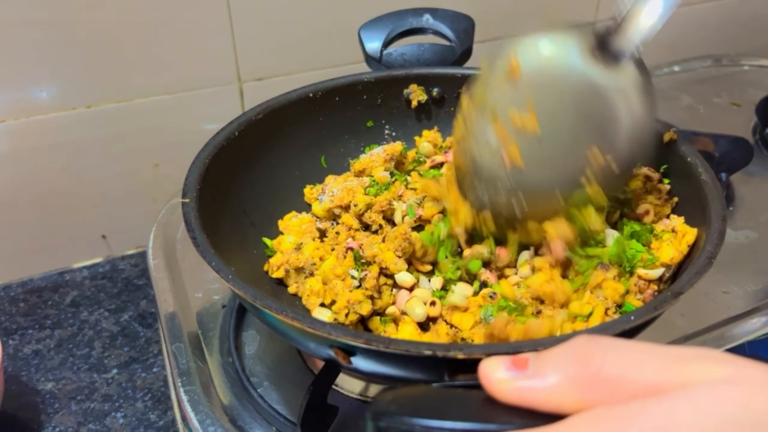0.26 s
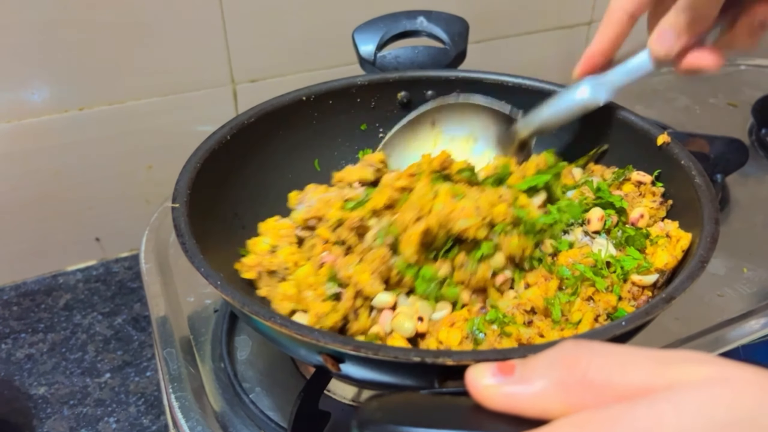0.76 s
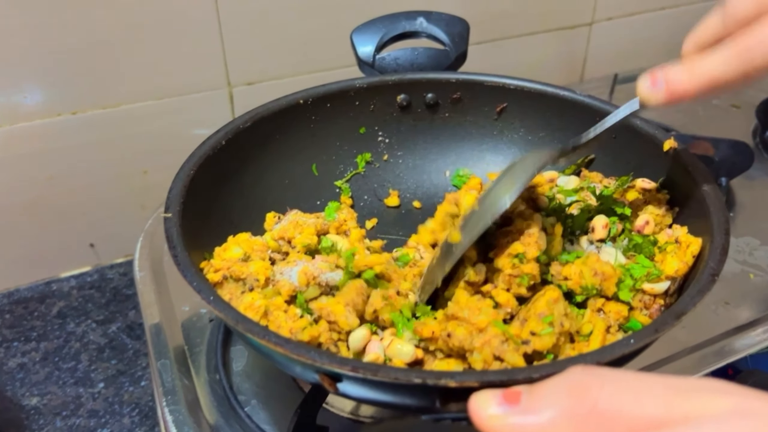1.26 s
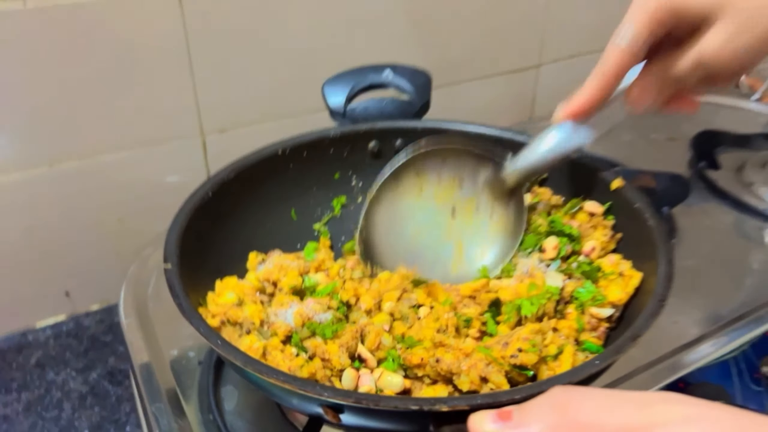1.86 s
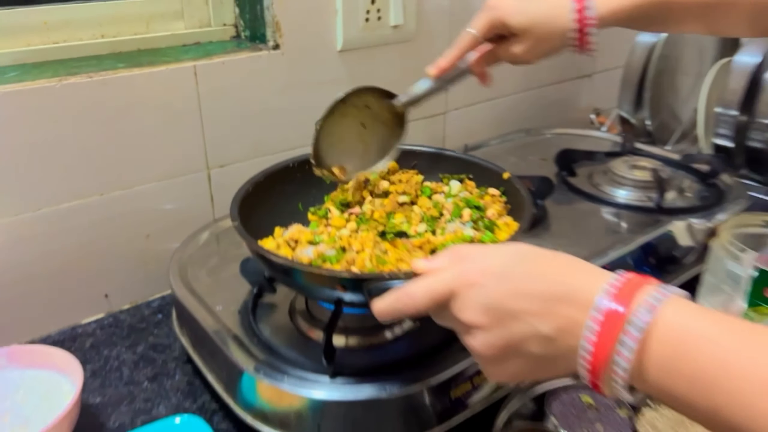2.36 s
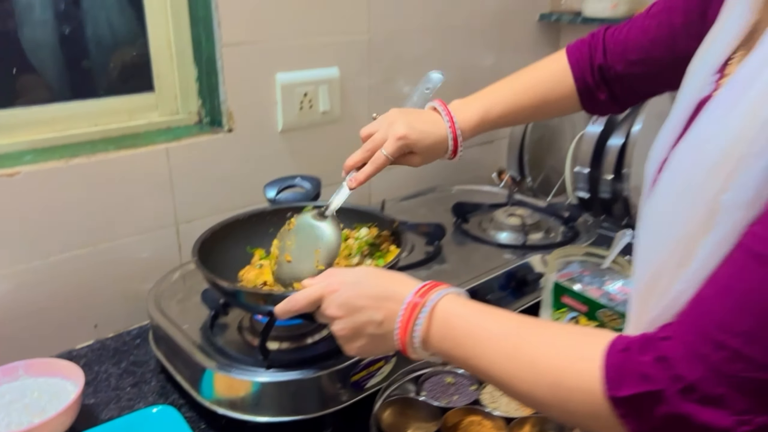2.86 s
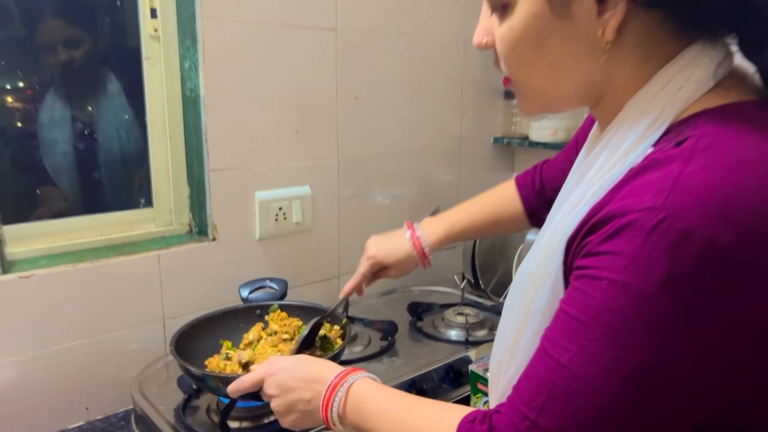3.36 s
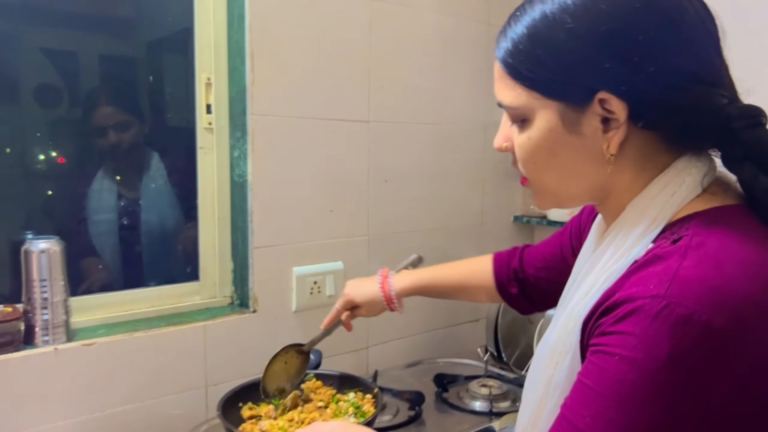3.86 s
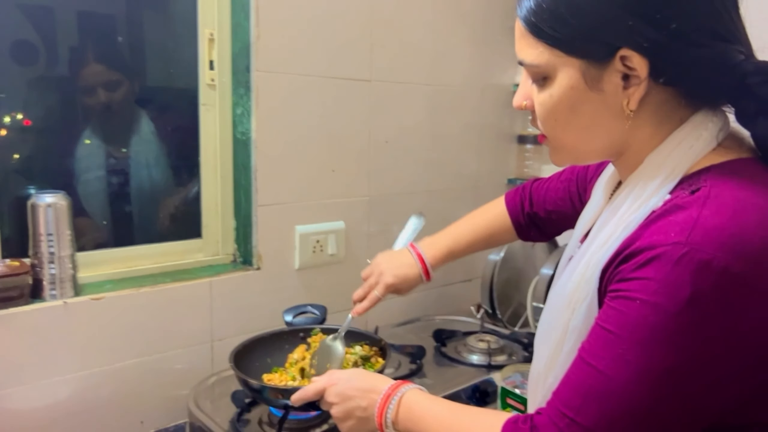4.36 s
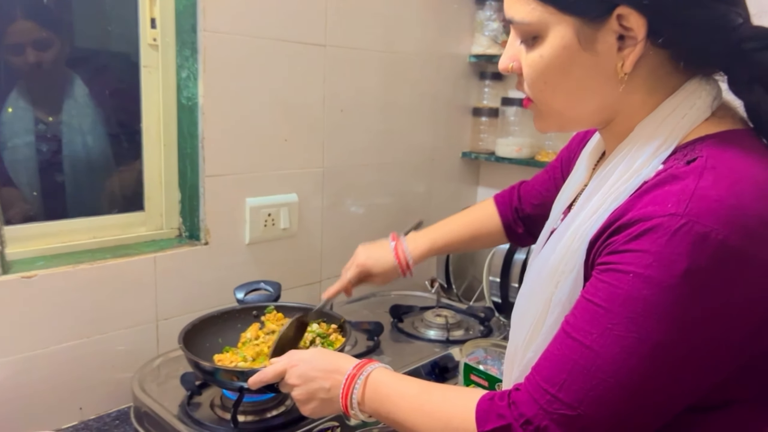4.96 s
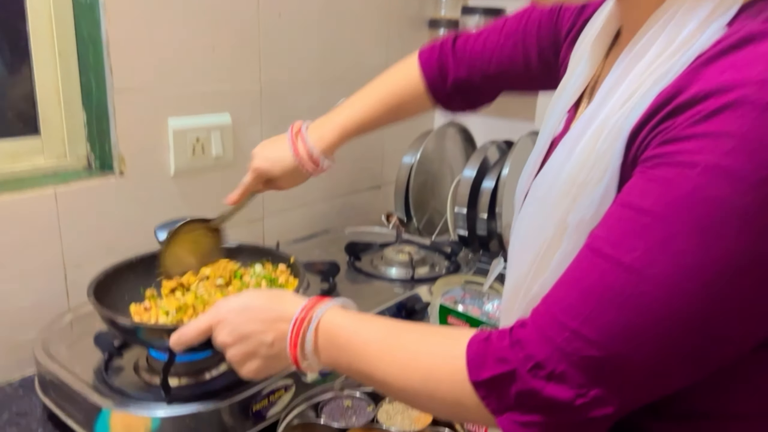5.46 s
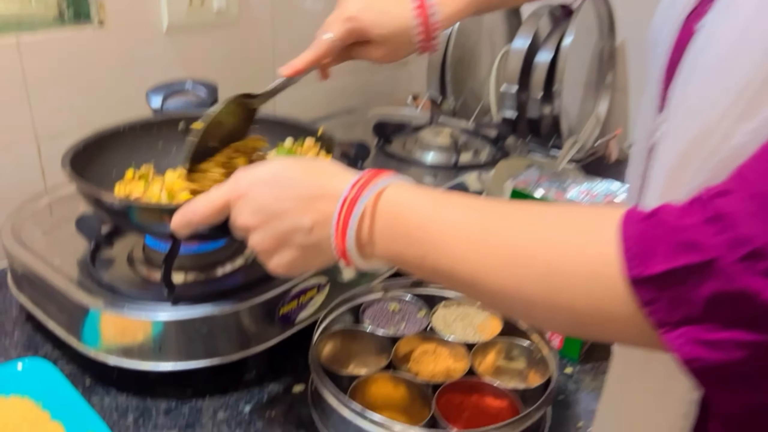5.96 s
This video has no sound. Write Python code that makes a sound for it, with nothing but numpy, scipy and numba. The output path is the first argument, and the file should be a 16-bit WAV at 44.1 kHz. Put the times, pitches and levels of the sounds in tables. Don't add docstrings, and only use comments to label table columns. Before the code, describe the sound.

A steel ladle knocks, ticks and scrapes irregularly in a food-filled pan on a hissing gas stove in a small tiled kitchen.

```python
import sys
import numpy as np
from scipy import signal
from scipy.fft import rfft, irfft, next_fast_len
from scipy.io import wavfile
from scipy.ndimage import uniform_filter1d
from numba import njit

SR = 44100
rng = np.random.default_rng(int(sys.argv[2]) if len(sys.argv) > 2 else 0)


def makeup_ratio(level_db):
    decades = np.asarray(level_db, float) / 20
    return 10 ** decades


def unload_wav(signal):
    wavfile.write(
        sys.argv[1],
        SR,
        np.round(np.clip(np.atleast_2d(signal).T, -1, 1) * 32767).astype(np.int16),
    )


N = 273420
T = np.arange(N) / SR

# frequency in Hz, level in dB, t60 in seconds.
THUD = [(153, -1, 0.11), (351, 1, 0.15), (395, 6, 0.053), (486, 2, 0.027), (636, -8, 0.046)]
BOWL = [(725, -1.5, 0.05), (848, -3.5, 0.032), (985, 5.5, 0.024), (1067, 12, 0.006), (1265, -8, 0.09),
        (1407, -4, 0.024)]
WALL = [(1717, 0.29, 0.01), (2030, 1, 0.037), (2077, 1, 0.045), (2370, 0.34, 0.019), (2634, 0.57, 0.045)]
EDGE = [(3020, 1.5, 0.048), (3400, -1.5, 0.039), (3574, -12, 0.037), (3670, -4, 0.0049)]
RIM = [(4330, -20, 0.018), (4980, 19, 0.0023), (5470, -14, 0.025), (5690, 3, 0.02), (6300, 6.5, 0.016),
       (7670, 11.5, 0.0076), (8430, -10, 0.0071)]
# time in seconds, distance in metres.
DISTANCE = [
    (0, 0.46),
    (1.5, 0.4),
    (3, 1.1),
    (6.2, .8),
]


def convolve(x, h):
    size = next_fast_len(len(x) + len(h))
    return irfft(rfft(x, size) * rfft(h, size), size)[:len(x)]


def colour(x, points):
    hz, db = np.transpose(points)
    grid = np.maximum(np.fft.rfftfreq(4096, 1 / SR), 1)
    log_gain = np.interp(np.log(grid), np.log(hz), db) * np.log(10) / 20
    cepstrum = irfft(log_gain)
    cepstrum[1:2048] *= 2
    cepstrum[2049:] = 0
    return convolve(x, irfft(np.exp(rfft(cepstrum))))


def unit(x):
    return x / np.sqrt(np.mean(x ** 2))


def walk(rate):
    hold = int(SR / rate)
    steps = np.repeat(rng.standard_normal(N // hold + 1), hold)
    slewed = uniform_filter1d(uniform_filter1d(steps, hold), hold)
    return unit(slewed[:N])


def add(out, s, sound):
    i = int(s * SR)
    out[i:i + len(sound)] += sound[:len(out) - i]


def background():
    # frequency in Hz, gain in dB.
    burner = [(150, -12.5), (300, 9), (600, -2.5), (1000, 1.5), (2000, 1.5), (3000, 3), (6000, -2),
              (9000, 3.5), (13000, 2), (17000, 1.5)]
    # time in seconds, level in dB.
    flame = [(0, -38.5), (.5, -41), (2.9, -40.5), (4.2, -39.5), (5.3, -44), (6.2, -43)]
    # frequency in Hz, width in Hz, level in dB.
    rumble = [(53.3, 11.6, -1), (106.6, 15, -6), (147.4, 10, -4), (178, 88, -3.5), (70.6, 67, -9)]
    # time in seconds, level in dB.
    machines = [(0, -41), (.5, -43.5), (2.9, -46), (3.7, -46.5), (4.2, -44), (5.3, -50), (6.2, -46.5)]
    flame_db = np.interp(T, *np.transpose(flame)) + 0.39 * walk(2.6)
    hiss = unit(colour(rng.standard_normal(N), burner)) * makeup_ratio(flame_db)
    hum = np.zeros(N)
    for hz, width_hz, db in rumble:
        line = signal.lfilter(*signal.iirpeak(hz, hz / width_hz, fs=SR), rng.standard_normal(N))
        line = signal.lfilter(*signal.iirpeak(hz, hz / width_hz / 2, fs=SR), line)
        hum += unit(line) * makeup_ratio(db + 0.5 * walk(2.06))
    return hiss + hum * makeup_ratio(np.interp(T, *np.transpose(machines)))


def ring(modes, detune=0., scatter_db=0.):
    hz, db, t60 = np.transpose(modes)[:, :, None]
    chance = rng.standard_normal((3, len(hz), 1))
    t = T[:SR // 8]
    phase = 2 * np.pi * hz * (1 + detune * chance[0]) * t + 2 * chance[2]
    level = makeup_ratio(db + scatter_db * chance[1] - 60 * t / t60)
    return (np.sin(phase) * level).sum(axis=0) / np.sqrt(len(hz))


def sink(t):
    return 1 - np.exp(-t / .0004)


def clatter(t, t60):
    fade = makeup_ratio(-60 * t / t60) * sink(t)
    even = rng.standard_normal(len(t))
    for share in (1, .3, .3, .2, .1):
        burst = rfft(even * fade ** share)
        even = irfft(burst / np.abs(burst), len(t))
    even *= fade ** .1
    return even * np.sqrt(np.sum(fade ** 2) / np.sum(even ** 2))


def blows():
    strikes = {"drop": (-13, -11, -16, -17.5, -7), "rap": (-17.5, -11.5, -7.5, -10, -14.5),
               "tick": (-39, -17, -10.5, -3.5, -12.5), "tap": (-20.5, -9.5, -7.5, -15, -17)}
    # time in seconds, peak in dB,
    # belly in dB (more of the full bowl), edge in dB (more bare steel).
    drops = [
        (0.555, -15.5, -1.5, 0.5),
        (.593, -13, 10.5, 4.5),
        (.627, 5, -3.5, 3),
        (1.22, -8.5, 0, -4.5),
        (5.421, -35, 3, -18),
        (6.084, -9.5, 4, -4),
    ]
    raps = [
        (3.031, -5, -1, 1),
        (3.387, -1.5, 0.23, -1.2),
        (3.634, -2, -1.7, -0.073),
        (4.402, -2.5, 2.2, 0),
        (4.78, -1, -2.1, 0.39),
        (5.026, -2.5, 2, -1.8),
    ]
    ticks = [
        (.978, -29, -8, -4),
        (1.115, -22, 2, -2.5),
        (1.393, -23.5, -17, -3.5),
        (2.138, -26.5, -13, 0),
        (2.508, -23.5, 11, 2),
        (5.376, -33.5, 9, 2),
        (5.491, -14, 5, -3),
    ]
    taps = [
        (1.041, -27, -5, -12),
        (1.197, -29, 2, 10),
        (1.893, -29, 3, 4),
        (3.627, -9.5, -7, -8),
        (4.758, -36, 10, 9),
        (5.022, -17.5, 6, 12.5),
        (5.952, -24, 1.5, -5),
        (5.996, -20, -3.5, -15),
        (6.163, -38, 3, 0),
    ]
    # time in seconds, peak in dB, Hz, t60 in seconds.
    pings = [(0.557, -18, 2040, 0.031), (.558, -24, 5500, 0.025), (1.117, -27, 3130, 0.045),
             (1.393, -33, 4330, .02), (1.393, -28, 1840, .02), (1.897, -27, 3610, 0.035),
             (2.508, -17.5, 3650, 0.054), (2.509, -20.5, 5230, 0.045), (2.509, -27, 6600, .02),
             (2.53, -36, 3740, .03), (5.492, -17.5, 3600, 0.053), (5.492, -16, 3130, 0.024),
             (5.495, -21, 5270, .04), (5.954, -21.5, 2960, 0.031), (3.032, -5, 2110, 0.027),
             (3.032, -11, 3860, 0.065), (3.388, -14, 3020, 0.055), (3.635, -13, 3550, .03),
             (4.402, -8, 2675, 0.043)]
    # time in seconds, peak in dB, Hz, t60 in seconds.
    bowl_notes = [(.558, -22.5, 1200, 0.016), (.591, -11.5, 760, 0.011), (.627, -4, 800, 0.015),
                  (1.042, -30.5, 907, 0.058), (1.221, -16.5, 850, 0.018), (1.995, -32.5, 1005, 0.061),
                  (3.032, -6.5, 976, 0.037), (3.387, -9, 920, 0.033), (3.634, -9, 1029, 0.024),
                  (4.401, -15, 944, 0.04), (4.781, -13, 956, 0.043), (5.027, -11, 1000, 0.02),
                  (5.72, -38, 900, .06), (6.084, -14.5, 890, 0.021)]
    out = np.zeros(N)
    for way, table in (("drop", drops), ("rap", raps), ("tick", ticks), ("tap", taps)):
        for s, db, belly_db, edge_db in table:
            lean_db = [0.37 * belly_db, belly_db, 0.28 * edge_db, edge_db, 0.24 * edge_db]
            thud_db, bowl_db, wall_db, rim_db, top_db = np.add(strikes[way], lean_db)
            parts = [(THUD, thud_db), (BOWL, bowl_db), (WALL, wall_db),
                     (EDGE, min(wall_db, rim_db) - 9.0), (RIM, rim_db)]
            body = sum(makeup_ratio(part_db) * ring(part, detune=0.025, scatter_db=5.0) for part, part_db in parts)
            t = T[:len(body)]
            hue = [(170, thud_db - 6.5), (350, thud_db + 13.0), (560, thud_db - 4.5),
                   (750, bowl_db + 1.5), (1250, bowl_db + 2.5), (2200, wall_db + 0.5),
                   (3300, wall_db - 3.0), (5500, rim_db - 6.5), (12000, rim_db + 1.5 + top_db)]
            clatter_t60 = 0.0074 + 0.023 * np.interp(s, *np.transpose(DISTANCE))
            fill = colour(clatter(t, clatter_t60), hue)
            add(out, s - .001, makeup_ratio(db - 3.5) * (makeup_ratio(-11) * body * sink(t) + makeup_ratio(10.0) * fill))
    for s, db, hz, t60 in pings:
        add(out, s - .001, makeup_ratio(db - 12.0) * ring([(hz, 0, t60), (hz - 140, -5, t60)]))
    for s, db, hz, t60 in bowl_notes:
        add(out, s - .001, makeup_ratio(db - 2) * ring([(hz, 0, t60), (hz + 60, -5, t60), (hz - 85, -5, t60)]))
    return out


def squeals():
    # start in seconds, end in seconds, start in Hz, end in Hz, level in dB.
    glides = [
        (2.56, 2.70, 3550, 3850, -56),
        (4.012, 4.062, 2110, 2180, -55),
        (4.076, 4.128, 3130, 3100, -49),
        (4.101, 4.155, 2540, 2510, -47),
        (4.098, 4.18, 3850, 3710, -53),
        (4.11, 4.166, 1200, 1330, -49),
        (.6, 0.9, 146, 146, -48),
        (.62, .9, 107, 107, -47),
        (2.6, 2.92, 147.6, 147.4, -47),
    ]
    out = np.zeros(N)
    wobble, flutter = walk(120), walk(70)
    for start, end, start_hz, end_hz, db in glides:
        span = slice(int(start * SR), int(end * SR))
        along = (T[span] - start) / (end - start)
        hz = (start_hz + (end_hz - start_hz) * along) * (1 + 0.016 * wobble[span])
        swell = np.sqrt(np.abs(np.sin(np.pi * along)))
        tone = np.sin(2 * np.pi * np.cumsum(hz) / SR)
        add(out, start, swell * makeup_ratio(db + 2.9 * flutter[span]) * tone)
    return out


def drags():
    # start in seconds, length in seconds, level in dB, bowl in dB and thud in dB against it.
    strokes = [(1.635, 0.09, -50.5, 0, -20), (1.897, 0.048, -47, -13, -21), (1.979, 0.17, -57.5, -2.5, -21),
               (2.122, 0.092, -48, -23, -9), (2.209, 0.136, -61, -13, 20.5), (2.339, 0.173, -51, 4, 9.5),
               (2.52, 0.21, -48, -5.5, -14), (2.842, 0.071, -61.5, 9, -18), (4.01, 0.14, -47.5, -3.5, -4),
               (5.399, 0.11, -54.5, -6, 16.5), (5.714, 0.052, -54, 11, -9)]
    slips_per_s, slip_scatter_db = 1500, 2
    attack_s, release_s, fade_db_per_s = 0.0077, 0.028, 14
    pressed = makeup_ratio(-60 * T[:SR // 8] / .012)
    out = np.zeros(N)
    for start, length, db, bowl_db, thud_db in strokes:
        t = T[:int((length + release_s) * SR)]
        chance = rng.random((3, SR // 2))[:, :len(t)]
        slip_db = slip_scatter_db * np.minimum(-np.log(chance[1]), 3)
        slips = (chance[0] < slips_per_s / SR) * makeup_ratio(slip_db) * np.sign(chance[2] - .5)
        wall, bowl, thud, rim = (
            unit(convolve(slips, pressed * ring(part, detune=0.082, scatter_db=1.5)))
            for part in (WALL + EDGE, BOWL, THUD, RIM))
        touch = np.clip(np.minimum(t / attack_s, 1 - (t - length) / release_s), 0, 1)
        touch = touch * makeup_ratio(db - 3.0 - fade_db_per_s * t)
        add(out, start, touch * (wall + makeup_ratio(bowl_db) * bowl + makeup_ratio(thud_db) * thud + makeup_ratio(-1.5) * rim))
    return out * makeup_ratio(2.5 * walk(25))


def judder():
    # time in seconds, slip rate in Hz, level in dB.
    course = [
        (2.2, 383, -70),
        (2.241, 390.5, -44),
        (2.319, 395, -45),
        (2.371, 405.5, -48),
        (2.406, 419.2, -25.5),
        (2.49, 412.6, -51.5),
        (2.515, 411, -58),
        (2.679, 399, -50),
        (2.76, 377, -77),
    ]
    # multiple of the slip rate, level in dB.
    orders = [(1, 0.5), (2, 5.5), (3, -5), (4, -1), (5, -13), (6, -3.5), (7, -14), (8, -26), (9, -30),
              (10, -28)]
    s, hz, db = np.transpose(course)
    span = slice(int(s[0] * SR), int(s[-1] * SR))
    slip_hz = np.interp(T[span], s, hz) * (1 + 0.014 * walk(60)[span])
    phase = 2 * np.pi * np.cumsum(slip_hz) / SR
    level_db = np.interp(T[span], s, db)
    grip_db = level_db - db.max()
    out = np.zeros(N)
    for k, order_db in orders:
        overtone_db = level_db - 8.5 + order_db + .2 * np.log2(k) * grip_db
        out[span] += makeup_ratio(overtone_db + 2.2 * walk(40.28)[span]) * np.sin(k * phase)
    return out


def kitchen(x, rise_s):
    # band centre in Hz, t60 in seconds.
    bands = [(250, 0.69), (500, 0.44), (1000, 0.42), (2000, 0.44), (4000, 0.41), (8000, 0.39),
             (14000, 0.23)]
    t = T[:SR]
    tail = np.zeros(SR)
    for hz, t60 in bands:
        limits = [hz / 2 ** .5, min(hz * 2 ** .5, .45 * SR)]
        band = signal.butter(2, limits, "band", fs=SR, output="sos")
        tail += signal.sosfilt(band, rng.standard_normal(SR)) * makeup_ratio(-60 * t / t60)
    swell = 1 - np.exp(-(t / rise_s) ** 2)
    echoes = rfft(tail * swell)
    power = np.abs(echoes) ** 2
    levelling = np.sqrt(uniform_filter1d(power, size=500) / uniform_filter1d(power, size=40))
    tail = irfft(echoes * levelling, SR) * np.sqrt(swell) * (t < .9)
    return convolve(x, makeup_ratio(9) * tail / np.sqrt(np.sum(tail ** 2)))


def scene():
    pan = blows() + drags() + judder() + squeals()
    metres = np.interp(T, *np.transpose(DISTANCE))
    far = np.interp(T, [1.5, 2.8], [0, 1])
    walls = kitchen((1 - far) * pan, rise_s=0.0078) + kitchen(far * pan, rise_s=0.002)
    direct = makeup_ratio(-0.5) * pan / metres
    return (direct + walls + background())[None]


@njit
def follow(x, attack, release):
    e, y = 0., np.empty(len(x))
    for i in range(len(x)):
        e += (abs(x[i]) - e) * (attack if abs(x[i]) > e else release)
        y[i] = e
    return y


def thin_treble(x):
    hz, _, cells = signal.stft(x, SR, nperseg=2048)
    band = uniform_filter1d(np.abs(cells) ** 2, size=5, axis=0)
    frame_db = 10 * np.log10(band.sum(axis=0) + 1e-12)
    loud_db = 0.47 * (frame_db - np.median(frame_db))
    uneven_db = np.repeat(4 * rng.standard_normal((129, len(frame_db))), 8, axis=0)[:len(hz)]
    top_db = np.clip((hz[:, None] - 13000) / 300, -1.5, 9)
    bar = makeup_ratio(-83.5 + uneven_db + top_db + loud_db) ** 2
    faint = (band < bar) & (hz[:, None] > 8000)
    cells[faint | (hz[:, None] > 16600)] = 0
    return signal.istft(cells, SR, nperseg=2048)[1][:N]


def band_limit(x):
    return signal.sosfilt(signal.butter(12, 16510, fs=SR, output="sos"), x)


def record(dry):
    # frequency in Hz, gain in dB.
    port = [(40, -3), (6500, 8), (7800, 5), (8500, -3), (9200, -19.5), (9700, -13), (10500, -5.5),
            (13000, 1), (15500, -5.5), (16500, -46)]
    x = colour(dry[0], port)
    loud = follow(x, 1 / (0.0087 * SR), 1 / (.12 * SR))
    x = x * np.minimum(1, makeup_ratio(-20.0) / (loud + 1e-9)) ** 0.19
    x = np.tanh(1.16 * x) / 1.16
    return band_limit(thin_treble(x)[None])


dry = scene()
out = record(dry)
unload_wav(out)
```